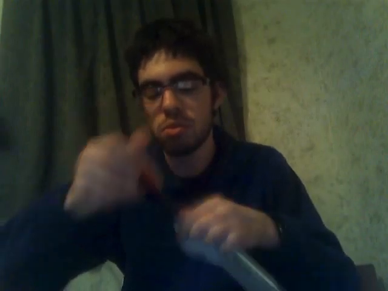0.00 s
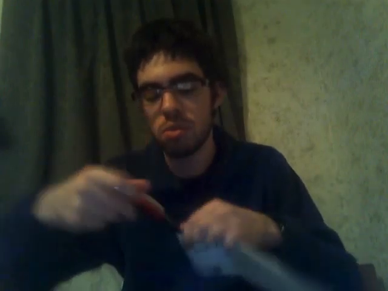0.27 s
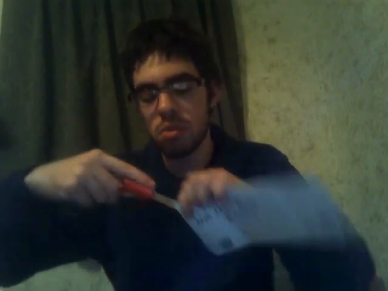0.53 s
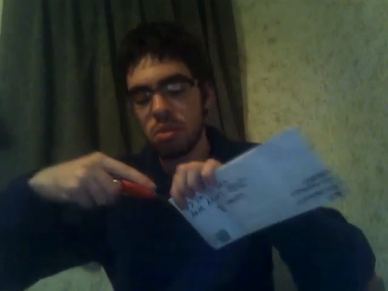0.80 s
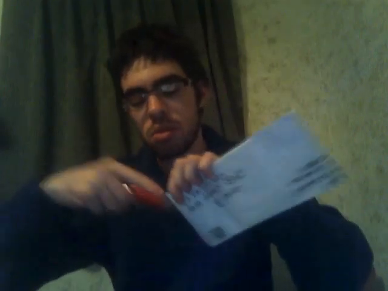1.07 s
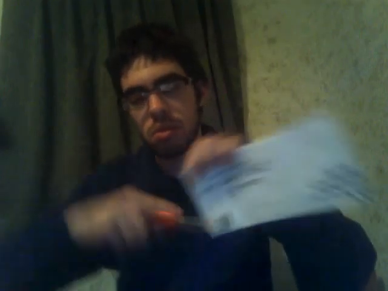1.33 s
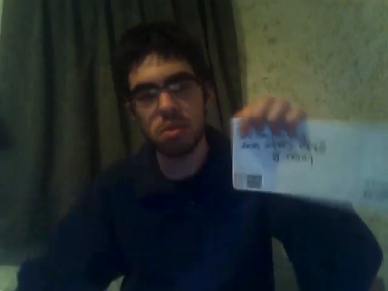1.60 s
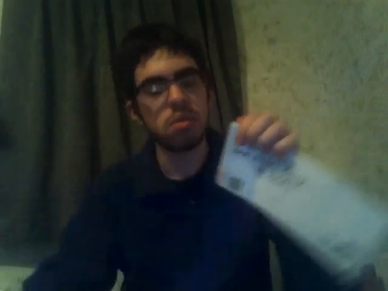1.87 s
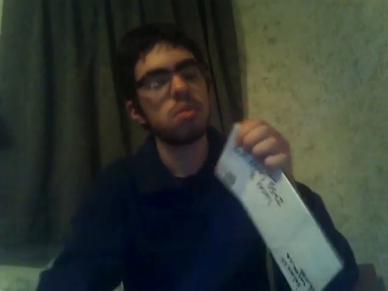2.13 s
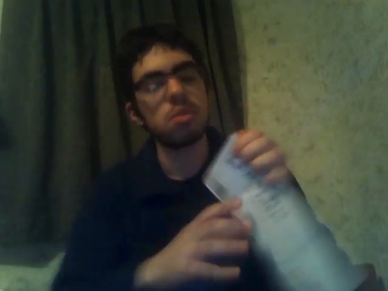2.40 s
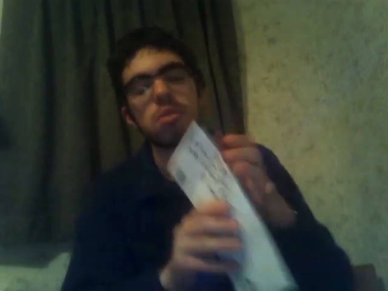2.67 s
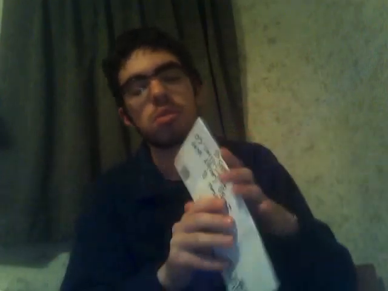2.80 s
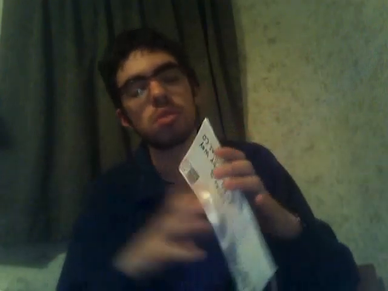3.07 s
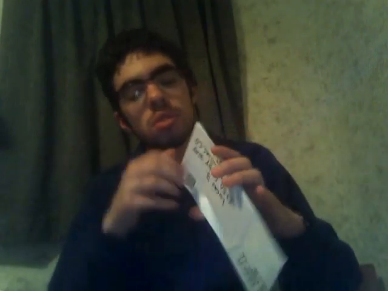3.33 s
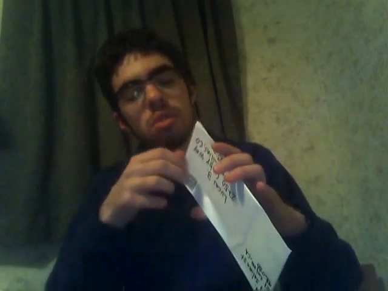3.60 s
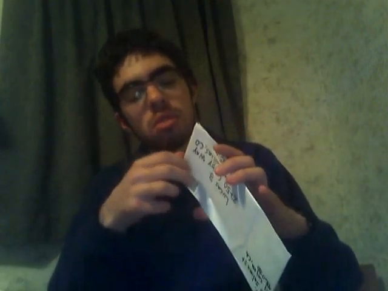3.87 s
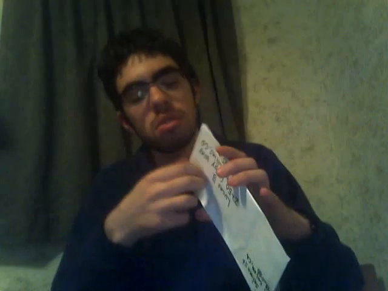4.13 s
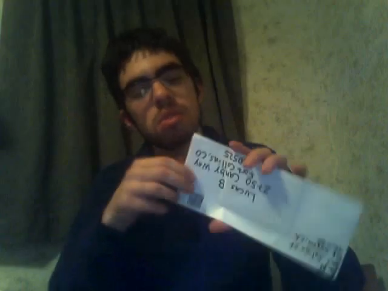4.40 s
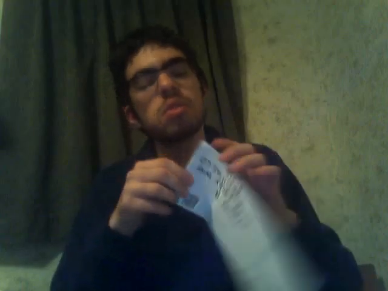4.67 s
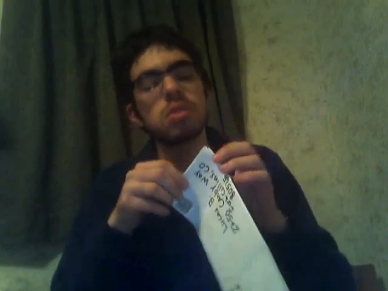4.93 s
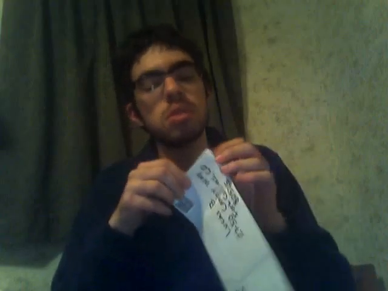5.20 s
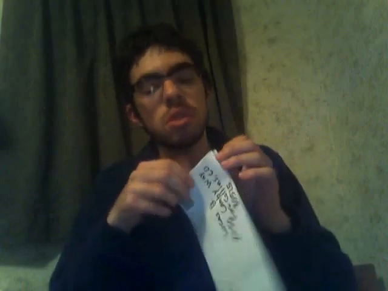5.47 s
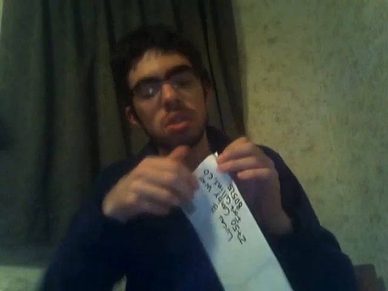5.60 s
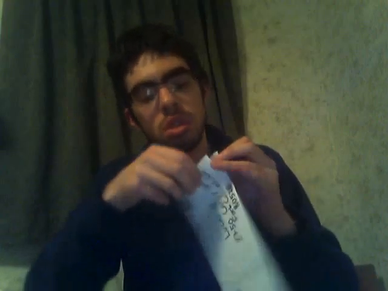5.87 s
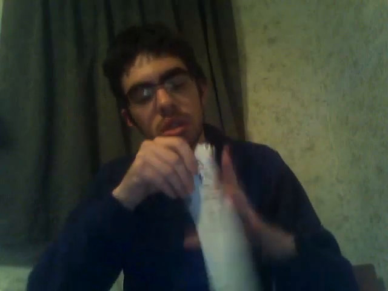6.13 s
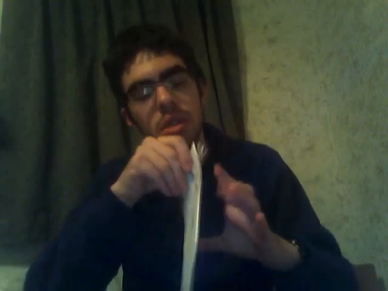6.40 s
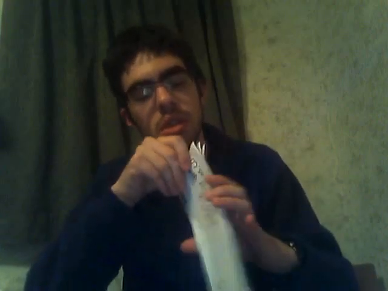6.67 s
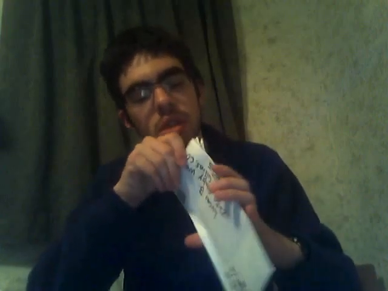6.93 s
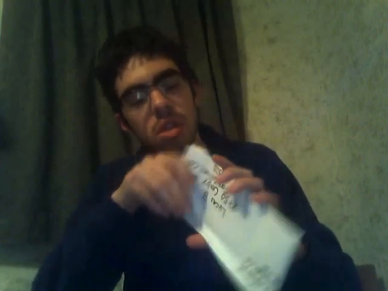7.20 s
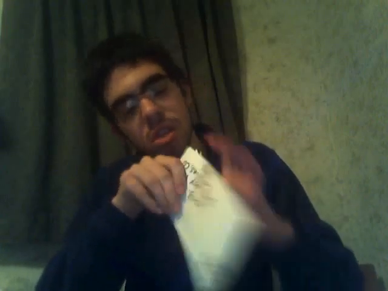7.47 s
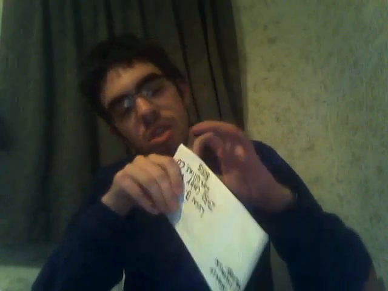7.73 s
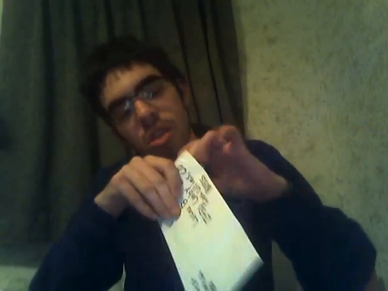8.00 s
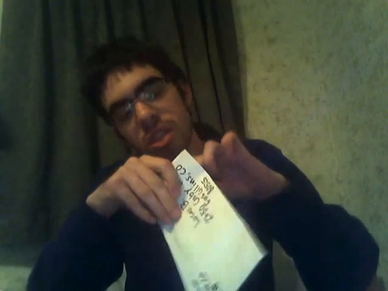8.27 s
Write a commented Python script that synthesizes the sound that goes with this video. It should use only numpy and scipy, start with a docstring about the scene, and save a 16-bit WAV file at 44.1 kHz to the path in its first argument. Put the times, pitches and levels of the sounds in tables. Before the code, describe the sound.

Close in a small quiet room, a stiff paper envelope ticks and rustles faintly. A pocket knife slits it in four short, dry rips, ending in a bright snap and a tiny low flap. A quiet stretch follows with scattered finger rubs and crackles, then firmer picking brings sharp paper pops. A small computer camera microphone adds low hiss, slight hum and a faint, high pulsing whine.

```python
"""Paper rustles and ticks faintly in the hands; then a pocket knife slits the envelope in four strokes.
After that it is flexed and picked open by hand, in a small quiet room.
The knife and the fingers are showers of tiny clicks, shaped in tone by filters.
Stiff panels buckle with short filtered bursts of noise, each with a rustle around it.
A small computer camera listens: it adds hiss and a faint whine that pulses with its frames."""
import sys
import numpy as np
from scipy import signal
from scipy.fft import rfft, irfft, next_fast_len
from scipy.io import wavfile
from scipy.ndimage import uniform_filter1d, map_coordinates

SR = 44100
rng = np.random.default_rng(int(sys.argv[2]) if len(sys.argv) > 2 else 0)


def to_wav(sig):
    """Store sig (one row per channel, or 1-D mono) as 16-bit WAV at the path in sys.argv[1].

    Samples outside -1..1 are clipped; the rate is SR.
    """
    pcm = np.clip(np.atleast_2d(sig), -1, 1) * 32767
    pcm = np.round(pcm).astype(np.int16)
    wavfile.write(sys.argv[1], SR, pcm.T)  # frames by channels


N = 365148  # samples, about 8.3 s


def amp(db):
    """Turn decibels into a gain."""
    return 10 ** (np.asarray(db) / 20)


def unit(x):
    """Scale a sound to an average strength (rms) of 1."""
    return x / np.sqrt(np.mean(x ** 2) + 1e-20)


def along(points, hz):
    """Join (pitch_hz, value) points by straight lines on a log pitch axis."""
    point_hz, values = np.transpose(points)
    return np.interp(np.log(hz + 1), np.log(point_hz), values)


def wobble(rate, n):
    """A smooth random curve of n samples, with rate random points a second."""
    knots = rng.standard_normal(int(n * rate / SR) + 4)
    return map_coordinates(knots, [np.arange(n) * rate / SR], mode="nearest")


def coloured(x, gain_db):
    """Filter x by a dB gain that depends on pitch; no sound comes out before it goes in."""
    m = 2 * next_fast_len(len(x))
    gain = amp(gain_db(np.fft.rfftfreq(m, 1 / SR))) + 1e-6
    # folding the cepstrum forward in time gives the filter its minimum delay
    cepstrum = irfft(np.log(gain), m)
    cepstrum[1:m // 2] *= 2
    cepstrum[m // 2 + 1:] = 0
    return irfft(rfft(x, m) * np.exp(rfft(cepstrum)), m)[:len(x)]


def resonance(hz, centre_hz, width_hz):
    """A bell-shaped curve over pitch that is 1 at its centre."""
    return 1 / (1 + (2 * (hz - centre_hz) / width_hz) ** 2)


def add(track, s, sound):
    """Mix a sound into the track from time s, in seconds."""
    part = track[max(round(s * SR), 0):][:len(sound)]
    part += sound[:len(part)]


def grains(rate, n, spread_db):
    """Tiny clicks of random size at random moments; the mean power stays even as the rate changes."""
    falls = rng.random(n) < rate / SR
    sizes = amp(spread_db * np.clip(rng.standard_normal(n), -2, 2))
    signs = rng.choice([-1, 1], n)
    return unit(falls * sizes * signs / np.sqrt(rate))


# the blade runs along the fold; levels come before the trim and the catching in cuts():
# (start_s, end_s, first_level_db, last_level_db, run_up_s, most_fibres_per_s)
KNIFE_STROKES = [(0.546, 0.599, -47.5, -27, 0.0027, 2500), (0.865, 0.969, -28.5, -39, 0.002, 7700),
                 (1.101, 1.324, -27, -28, 0.051, 20000), (1.432, 1.479, -29.5, -14, 0.012, 21000)]
# tone of parting fibres, before harder strokes brighten it: (pitch_hz, relative_level_db)
FIBRE_TONE = [(100, -26.5), (180, -19), (330, -8), (650, -11.5), (1300, -14), (2000, 1.5), (2600, -11.5),
              (3400, -2.5), (4100, -7), (5400, 1), (7200, -8), (8700, -10), (11500, -27.5), (16000, -38)]
BLADE_STOP_S = 0.0055  # fade at the end of a stroke
FIBRES_FOLLOW = 0.7  # the fibre rate goes with this power of the stroke's strength


def cuts(level_db=-2.0, catch_db=1.0, sharpen=0.24):
    """Fibres part one by one at the blade, which catches and runs on; the envelope colours them."""
    out = np.zeros(N)
    for start, end, first_db, last_db, run_up, rate in KNIFE_STROKES:
        t = np.arange(0, end - start, 1 / SR)
        run_up_curve = 1 - np.exp(-t / run_up)
        release = np.minimum((t[-1] - t) / BLADE_STOP_S, 1)
        pull = amp(np.linspace(first_db, last_db, len(t))) * run_up_curve * release
        fibre_rate = np.clip(rate * (pull / pull.max()) ** FIBRES_FOLLOW, 100, SR)
        fibres = grains(fibre_rate, len(t), spread_db=2.5)
        edge = sharpen * (max(first_db, last_db) + 25.5)  # harder strokes are brighter
        tear = unit(coloured(fibres, lambda hz: along(FIBRE_TONE, hz) + edge * np.log2(1 + (hz / 8000) ** 2)))
        catching = amp(level_db + catch_db * wobble(219.6, len(t)))
        add(out, start, tear * pull * catching)
    return out


# the whole envelope, freed from the blade: (pitch_hz, starting_peak_db, time_to_fall_60_db_s)
FLAP_TONES = [(184, -31.5, 0.041), (310, -43, 0.021), (490, -30, 0.067)]


def flap(s=1.4765):
    """The blade leaves the last corner and the envelope springs back: a few low tones die away."""
    out, t = np.zeros(N), np.arange(SR // 10) / SR
    tones = [amp(db - 60 * t / t60) * np.sin(2 * np.pi * hz * t) for hz, db, t60 in FLAP_TONES]
    add(out, s, sum(tones))
    return out


SNAP_T60_S = 0.011  # a buckled sheet's shudder falls 60 dB in this time, or sooner


def snap_band(t60, shape_db, rise=0.00021, flip=0.00068, stop=0.014, size=2048, count=256):
    """The sheet flips in a millisecond and shudders briefly; as much energy as count samples of rms 1."""
    t = np.arange(size) / SR
    onset = 1 - np.exp(-t / rise)
    decay = amp(-60 * np.maximum(t - flip, 0) / t60) / (1 + (t / stop) ** 6)
    shudder = rng.standard_normal(size) * onset * decay
    return unit(coloured(shudder, shape_db)) * np.sqrt(count / size)


# the paper buckles or a fibre bundle gives way:
# (start_s, crack_level_db, crack_pitch_hz, panel_level_db, panel_pitch_hz)
BUCKLES = [(0.0131, -50.5, 4940, -43.5, 2180), (0.1066, -56, 5100, -48.5, 2060),
           (0.42, -49, 5800, -57, 1730), (0.49, -46.5, 5700, -53.5, 2250), (0.567, -40, 5900, -53, 2770),
           (0.5827, -34, 5450, -30, 2200), (0.5878, -24.5, 5060, -25.5, 2180),
           (0.5906, -34, 5070, -29, 3460), (0.842, -34, 5600, -37, 2110), (0.867, -28, 5400, -31.5, 2470),
           (0.873, -27, 5350, -36, 2330), (0.9753, -56, 5600, -42, 1940), (1.381, -42, 6070, -48.5, 2150),
           (1.4751, -23, 5700, -20.5, 1960), (1.4906, -21.5, 6000, -37, 3210),
           (1.4924, -21.5, 6000, -31, 3160), (2.652, -40, 5200, -37.5, 1900),
           (2.665, -20.5, 4800, -31.5, 3010), (2.7334, -42, 5440, -41, 2080), (3.011, -34, 5530, -38, 2180),
           (3.047, -42, 5300, -37, 1950), (3.062, -42.5, 6440, -42.5, 2000),
           (3.2412, -31.5, 5670, -68, 3460), (4.3779, -40, 5760, -41, 2820),
           (4.778, -62, 5300, -50.5, 1760), (4.8938, -43, 5200, -43.5, 1950),
           (4.924, -40.5, 5870, -50, 2090), (4.943, -39.5, 6100, -44, 2260),
           (4.983, -46, 5400, -39.5, 2040), (5.2905, -46, 5500, -48, 1830),
           (5.3081, -37.5, 5860, -48, 2970), (5.581, -43.5, 5340, -40.5, 1970),
           (5.6251, -51, 4330, -45.5, 1860), (5.662, -68, 4800, -49.5, 1820),
           (5.9253, -52, 5000, -45.5, 1910), (5.951, -26, 4740, -32.5, 2930), (6.01, -40, 5800, -45, 2090),
           (6.024, -34, 4400, -36.5, 2710), (6.043, -34.5, 5260, -31.5, 2700),
           (6.1098, -47.5, 5030, -43.5, 2830), (6.1273, -43, 4500, -34, 2150),
           (6.219, -18.5, 5580, -22, 2050), (6.235, -31, 5500, -32.5, 3480),
           (6.681, -43.5, 4700, -45.5, 2600), (6.7241, -46.5, 4730, -39, 2320),
           (6.7812, -44, 5000, -34.5, 1840), (6.8003, -15, 5400, -24, 3070),
           (6.8334, -12, 5920, -22.5, 2120), (7.1059, -39.5, 5660, -43.5, 2160),
           (7.2092, -21, 5600, -24.5, 2870), (7.23, -44, 5200, -39, 3050), (7.242, -34.5, 5600, -56, 2510),
           (7.2934, -22.5, 5530, -31.5, 2500), (7.3073, -37, 5500, -49, 2350),
           (7.388, -47, 5050, -45.5, 2370), (7.4466, -25, 5700, -35, 2070), (7.458, -21.5, 5400, -26, 2270),
           (7.5672, -42, 5370, -35.5, 2770), (7.5937, -53.5, 4270, -39, 1750),
           (7.6883, -49, 5300, -47, 3110), (7.9193, -43.5, 5550, -44.5, 1780),
           (8.0364, -36.5, 5140, -38.5, 2320), (8.0698, -21.5, 5040, -28.5, 2830),
           (8.1724, -52, 5100, -49.5, 3080), (8.2046, -44.5, 4600, -38, 1940),
           (8.2242, -42.5, 5060, -42, 1930), (8.2729, -38, 4730, -42, 1960)]
# basic tone of a crease that flips: (pitch_hz, relative_level_db)
CREASE_TONE = [(2800, -18.5), (3900, -3), (5600, -4), (7000, -4.5), (8500, -11.5), (10000, -19.5),
               (12000, -31.5), (16000, -40.5)]
# basic tone of the stiff sheet around it: (pitch_hz, relative_level_db)
PANEL_TONE = [(800, -29.5), (1400, -3.5), (1900, 5.5), (3500, 0), (4800, -13), (12000, -61)]
# basic tone of the air that the sheet pushes: (pitch_hz, relative_level_db)
AIR_TONE = [(70, -16.5), (200, -2), (450, 4.5), (700, -3), (1050, 3), (1900, -24), (8000, -40)]
THUD_DB, THUD_GROWS = -44, 0.5  # air level for a -35 dB panel; dB more per dB of the panel


def snaps(buckles, focus, crack_db=0., panel_db=0., crack_peak_db=13.0, panel_peak_db=7.5,
          crack_width_hz=1300, panel_width_hz=600, sharpen=0.14):
    """Each buckle cracks at the crease, rings the panel and pushes a little air; focus scales resonances."""
    out = np.zeros(N)
    for s, crack, crack_hz, panel, panel_hz in buckles:
        thud = THUD_DB + THUD_GROWS * (panel + 35)
        edge = sharpen * (crack + 35)  # harder snaps are brighter

        def crease(hz):
            peak = focus * crack_peak_db * resonance(hz, crack_hz, crack_width_hz)
            return along(CREASE_TONE, hz) + peak + edge * np.log2(1 + hz / crack_hz)

        def sheet(hz):
            return along(PANEL_TONE, hz) + focus * panel_peak_db * resonance(hz, panel_hz, panel_width_hz)

        def air(hz):
            return along(AIR_TONE, hz) + edge * np.log2(1 + hz / panel_hz)

        for db, shape in [(crack + crack_db, crease), (panel + panel_db, sheet), (thud, air)]:
            add(out, s, amp(db) * snap_band(SNAP_T60_S, shape))
    return out


SETTLE_LEAD_S, SETTLE_S = 0.01, 0.048  # the rub starts before a buckle and ends after it
SETTLE_DB, SETTLE_TILT_DB = -20.5, -3  # level against the panel; tilt per octave


def settling():
    """The two sheets rub on each other as a panel buckles and settles; rows as in FINGER_SLIDES."""
    return [(s - SETTLE_LEAD_S, s + SETTLE_S, panel + SETTLE_DB, SETTLE_TILT_DB)
            for s, crack, crack_hz, panel, panel_hz in BUCKLES]


# fingers slide over the paper; speed and grip then shape the level:
# (start_s, end_s, level_db, tilt_db_per_octave)
FINGER_SLIDES = [(0.073, 0.167, -54.5, -5.5), (0.191, 0.397, -51, 4.5), (0.687, 0.733, -57, 2),
                 (0.832, 0.856, -42, 1), (1.361, 1.431, -49, 10), (1.959, 2.34, -62.5, 0.5),
                 (2.618, 2.73, -44, -2), (3.033, 3.095, -48, -5), (4.586, 4.642, -49, -1),
                 (4.652, 4.782, -52, 1.5), (4.876, 5.009, -46, 11), (5.134, 5.17, -55.5, -1),
                 (5.288, 5.353, -51, 11), (5.848, 5.922, -46, 2), (6.005, 6.08, -46, -1.5),
                 (6.29, 6.359, -50, -1), (6.482, 6.574, -53, 7), (6.777, 6.8, -43, -7.5),
                 (7.103, 7.211, -47, 3), (7.282, 7.317, -44, 2), (7.336, 7.388, -51.5, -8.5),
                 (7.422, 7.456, -42.5, -2), (7.926, 8.057, -55.5, 5), (8.05, 8.076, -39, 2),
                 (8.242, 8.3, -42, -3.5)]
# basic tone of skin on paper: (pitch_hz, relative_level_db)
RUB_TONE = [(120, -30.5), (350, -12.5), (1200, -6), (1900, -5.5), (3300, -7.5), (4600, -4.5), (5600, 3),
            (8000, -12.5), (11000, -26.5), (16000, -51)]
RUB_GRAINS_PER_S, SETTLE_GRAINS_PER_S = 4000, 1300  # skin rubs finely, settling sheets crackle coarsely


def slides(strokes, rate, level_db=0., grip_db=2.5, lateness=1.01):
    """Skin or paper rubs over the paper's grain; each stroke gathers speed, then stops, gripping unevenly."""
    out = np.zeros(N)
    for start, end, db, tilt in strokes:
        n = int(max(end - start, .01) * SR)
        friction = grains(rate, n, spread_db=4.)

        def tone(hz):  # the tilt levels off below 300 Hz and above 8000 Hz
            return along(RUB_TONE, hz) + tilt * np.log2((hz + 300) / (1 + hz / 8000) / 3300)

        rub = unit(coloured(friction, tone))
        speed = np.abs(np.sin(np.pi * np.linspace(0, 1, n) ** lateness)) ** 0.46
        grip = amp(db + level_db + grip_db * wobble(96.4, n))
        add(out, start, rub * speed * grip)
    return out


# how strongly the envelope is shifted in the hands, before each layer's own trim: (time_s, level_db)
HAND_EFFORT = [(0, -59.5), (1.05, -63.5), (1.7, -63.5), (1.85, -69.5), (2.6, -65.5), (3.1, -64.5),
               (3.5, -72.5), (4.1, -66.5), (4.6, -60), (5.7, -67.5), (6.1, -58), (6.6, -66.5), (7.4, -57.5),
               (8.28, -57.5)]


def crinkle(level_db=-2.0, clump_db=5.0):
    """The held envelope crinkles faintly, in little clumps, louder as the hands work harder."""
    clumps = amp(clump_db * wobble(45, N))
    clicks = unit(grains(1500, N, spread_db=3.) * clumps)
    s, db = np.transpose(HAND_EFFORT)
    level = amp(level_db + np.interp(np.arange(N) / SR, s, db))
    return level * unit(coloured(clicks, lambda hz: along(RUB_TONE, hz)))


def ticks(count=60, crack_db=2.5, panel_db=2., spread_db=3.):
    """Faint random buckles, more often and louder the more the envelope is handled; rows as in BUCKLES."""
    s, db = np.transpose(HAND_EFFORT)
    draws = rng.random((count, 6))
    times = draws[:, 0] * N / SR
    effort = np.interp(times, s, db)
    crack, panel = effort + spread_db * (2 * draws[:, 1:3].T - 1)
    crack_hz = 4800 + 1200 * draws[:, 3]
    panel_hz = 1750 + 750 * draws[:, 4]
    rows = np.column_stack([times, crack + crack_db, crack_hz, panel + panel_db, panel_hz])
    kept = draws[:, 5] < amp(effort - db.max()) ** 2
    return list(rows[kept])


def flexing(x, depth_db=2.5):
    """The envelope bends as it is worked, so its many small resonances come and go."""
    z = signal.stft(x, nperseg=512)[2]
    field = uniform_filter1d(rng.standard_normal(z.shape), size=4, axis=0)  # smooth over pitch
    field = uniform_filter1d(field, size=9, axis=1)  # smooth over time
    return signal.istft(z * unit(amp(depth_db * unit(field))), nperseg=512)[1][:N]


# how long the reflections last: (pitch_hz, time_to_fall_60_db_s)
ROOM_DECAY = [(200, 0.11), (2000, 0.19), (5800, 0.19), (12000, 0.13)]
# tone of the reflections: (pitch_hz, relative_level_db)
ROOM_TONE = [(100, -3), (500, 3), (2000, -1), (4000, -2.5), (5800, 1), (8000, -5), (15000, 3.5)]


def room_tail(gap=0.0038, uneven_db=2.5):
    """Reflections swell in over a short gap, in uneven clusters; bass and top treble die soonest."""
    size = SR // 3
    arrivals = rng.standard_normal(size) * amp(uneven_db * wobble(403, size))
    hz, t, z = signal.stft(arrivals, SR, nperseg=256)
    fade_db = along(ROOM_TONE, hz)[:, None] - 60 * t / along(ROOM_DECAY, hz)[:, None]
    tail = signal.istft(z * amp(fade_db), SR, nperseg=256)[1]
    tail *= np.clip(np.arange(len(tail)) / SR / gap, 0, 1) ** 3
    return tail / np.linalg.norm(tail)


def room(x, count=24):
    """The reflections change as the envelope moves about: a new tail for each of count stretches."""
    out = np.zeros(N)
    for piece in np.array_split(np.arange(N), count):
        add(out, piece[0] / SR, signal.fftconvolve(x[piece], room_tail()))
    return out


# tone of the room and microphone noise: (pitch_hz, relative_level_db)
NOISE_TONE = [(12, -29), (20, -0.5), (58, -2.5), (81, -13.5), (110, -6), (182, -14), (241, -11.5),
              (270, -17), (337, -11), (388, -17.5), (513, -12), (738, -15), (4180, -32), (8180, -32.5),
              (16000, -54)]
# mains hum: (pitch_hz, rms_level_db)
MAINS_HUM = [(120, -73.5), (240, -70), (480, -76)]


def background(noise_db=-55.0, whine_db=-67.0):
    """Steady filtered noise, mains hum as sine tones, and the camera's whine switched on once per frame."""
    t = np.arange(N) / SR
    noise = unit(coloured(rng.standard_normal(N), lambda hz: along(NOISE_TONE, hz)))
    hum = sum(amp(db) * np.sqrt(2) * np.sin(2 * np.pi * (hz * t + rng.random())) for hz, db in MAINS_HUM)
    readout = ((t - .005) * 7.513) % 1 < .25  # 7.513 frames a second, on for a quarter of each
    pulse = uniform_filter1d(readout * 1., 64)  # soft edges
    whine = np.sqrt(2) * np.sin(2 * np.pi * 8000 * t) * pulse
    return amp(noise_db) * noise + hum + amp(whine_db) * whine


def scene(room_db=-9.0, blur=0.28):
    """The paper, its reflections and the background."""
    buckles = list(BUCKLES) + ticks()
    fingers = slides(FINGER_SLIDES, RUB_GRAINS_PER_S)
    sheets = slides(settling(), SETTLE_GRAINS_PER_S)
    rustle = flexing(cuts() + fingers + sheets + crinkle()) + flap()
    # a snap sounds different in every direction, so its resonances blur in the reflections
    one_way = room(snaps(buckles, focus=1 - blur) + rustle)
    other_way = room(snaps(buckles, focus=1 - blur) + rustle)
    walls = (one_way + other_way) / np.sqrt(2)
    return (snaps(buckles, focus=0.93) + rustle + amp(room_db) * walls + background())[None]


TOP_HZ = 15900  # the camera's band limit


def record(dry):
    """The camera rounds off the very loudest peaks and keeps nothing above its band limit."""
    held = dry / (1 + np.abs(dry / .94) ** 8) ** (1 / 8)
    m = next_fast_len(N + SR // 2)
    kept = np.fft.rfftfreq(m, 1 / SR) < TOP_HZ
    return irfft(rfft(held, m) * kept, m)[..., :N]


dry = scene()
out = record(dry)
to_wav(out)
```